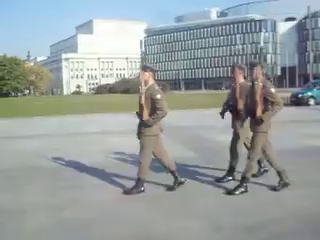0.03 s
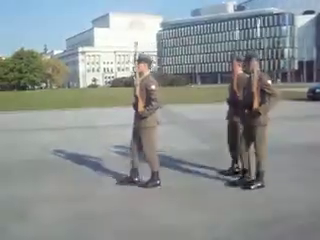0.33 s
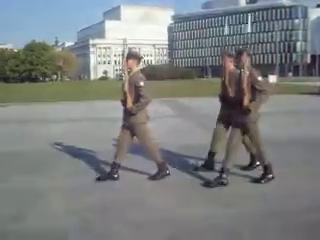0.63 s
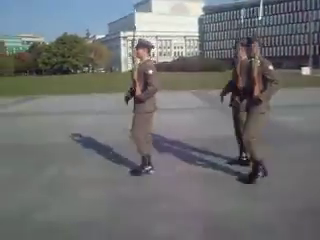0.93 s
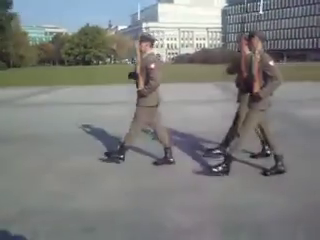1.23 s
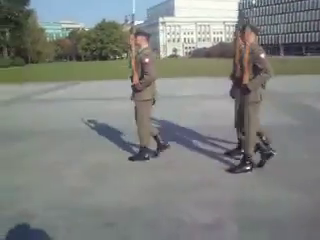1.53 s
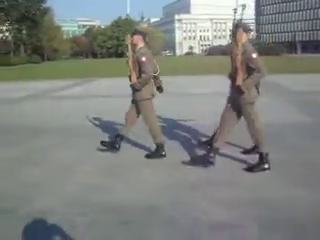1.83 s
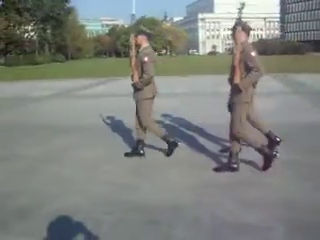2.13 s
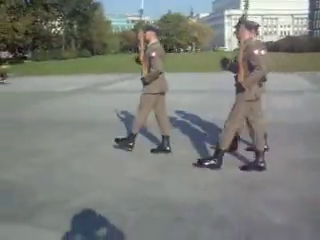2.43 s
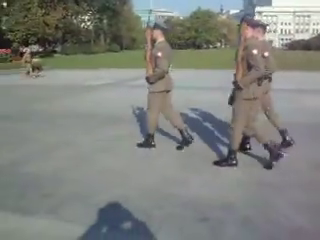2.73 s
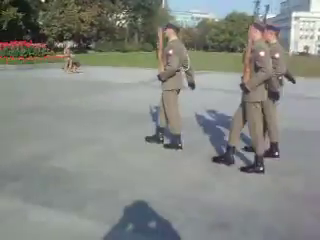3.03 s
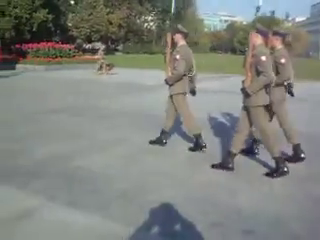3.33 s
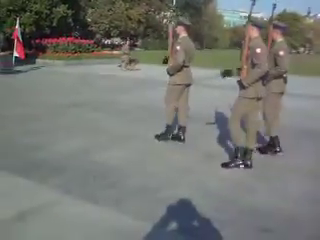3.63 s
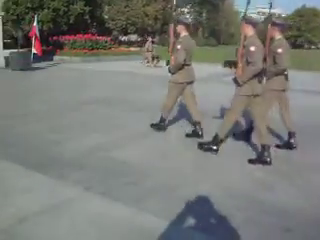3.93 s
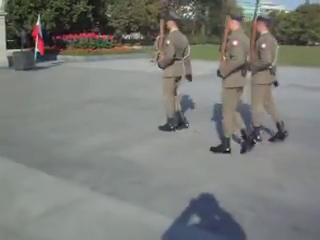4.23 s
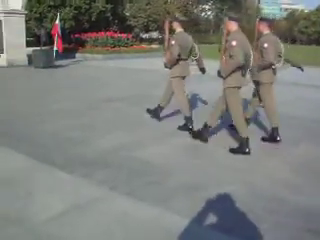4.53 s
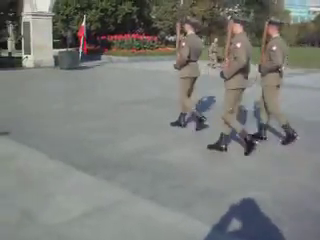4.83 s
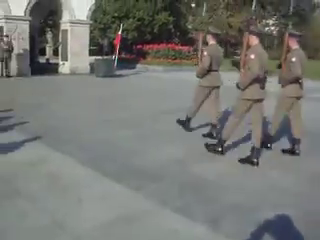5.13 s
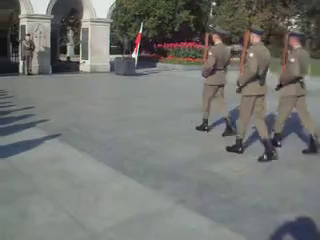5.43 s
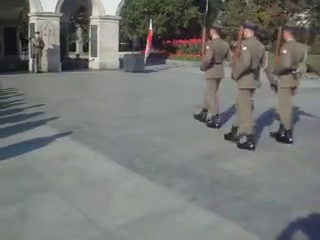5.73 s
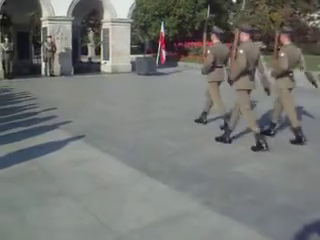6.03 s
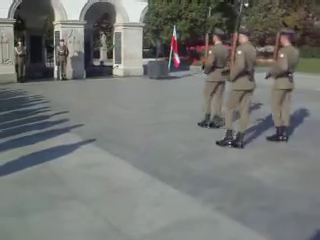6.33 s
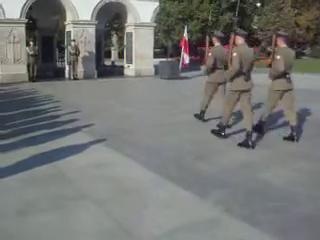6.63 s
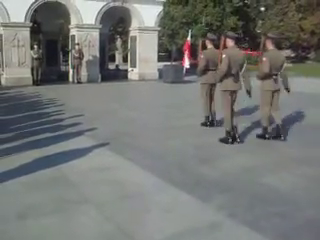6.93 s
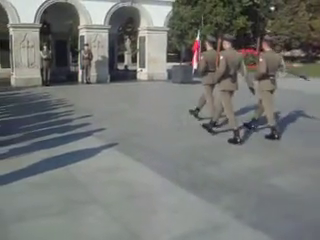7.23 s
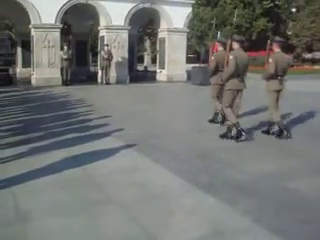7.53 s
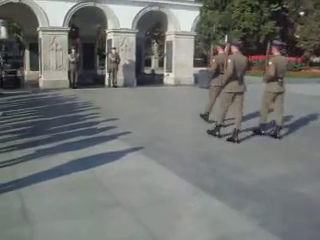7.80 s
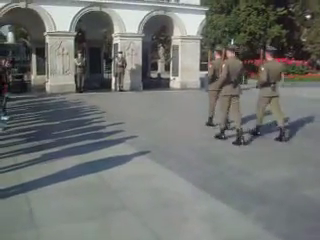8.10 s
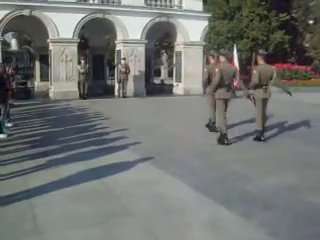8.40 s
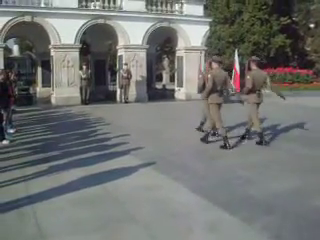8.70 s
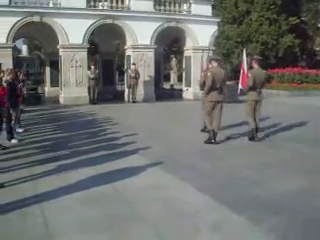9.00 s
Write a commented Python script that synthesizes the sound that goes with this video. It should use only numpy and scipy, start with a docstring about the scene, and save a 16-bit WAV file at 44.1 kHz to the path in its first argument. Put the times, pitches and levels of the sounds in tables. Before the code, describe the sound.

Guards' slow, even marching steps thud and scuff across an open stone square while far-off traffic hums.

```python
"""Far traffic hums round a wide stone square, and the recorder adds a thin whine. From the start,
three guards march in step: each pace is a gritty scuff, a heel thud and three ragged sole slaps,
echoed by a row of columns. Grit and kit click; a few squeaks and a creak come in the first two seconds.
One far engine speeds up, and from about two seconds on another is heard slowing down.
As the guards near the columns, the echo comes back sooner and louder."""
import sys
import numpy as np
from scipy import signal
from scipy.fft import rfft, irfft
from scipy.io import wavfile

SR = 44100
rng = np.random.default_rng(int(sys.argv[2]) if len(sys.argv) > 2 else 0)


def wav_out(sig):
    """Save sig, one row per channel (or a flat mono array), as 16-bit PCM at SR to the path in sys.argv[1]."""
    wavfile.write(sys.argv[1], SR, np.round(np.clip(np.atleast_2d(sig).T, -1, 1) * 32767).astype(np.int16))


N = 408366
T = np.arange(N) / SR
# One row a pace: the hardest heel lands and three soles slap down, never quite together.
# (heel time [s], lag of sole 1 [s], of sole 2 [s], of sole 3 [s], heel [dB], boom [dB], thump [dB],
# clap [dB], grit [dB], extra force of sole 2 [dB], of sole 3 [dB], air pocket pitch [Hz], scuff [dB])
PACES = [(0.0839, .0012, 0.0056, 0.017, -31.5, -35, -35.5, -38.5, -47, 5, 3, 2910, -59),
         (0.7579, .0075, .0116, .0163, -34, -25, -27, -35.5, -33.5, -2, -7.5, 1000, -61.5),
         (1.4156, .0203, .0231, .027, -29.5, -31.5, -30.5, -36, -39, -2, 3, 1370, -57.5),
         (2.0819, 0.014, .0198, 0.041, -26.5, -32, -35, -39.5, -41, 4.5, 5, 1450, -72),
         (2.7493, 0.021, .0312, 0.038, -30, -30.5, -33, -37.5, -42, 4, -2, 2250, -58.5),
         (3.4336, .016, .0203, 0.024, -29, -31.5, -40, -36.5, -38.5, 3, 5.5, 2500, -66),
         (4.1185, -0.0098, -0.013, .0165, -24, -39.5, -37, -39, -44, 5, 11.5, 1570, -59),
         (4.7929, -.0015, 0.0027, .0124, -23, -35, -34, -36, -40, 2.5, 5, 1460, -74),
         (5.453, 0.0077, .016, 0.025, -27, -30, -29.5, -34, -38.5, -1.5, -6.5, 1620, -57.5),
         (6.135, .011, .016, .0204, -25, -31.5, -28.5, -36.5, -36.5, -1, 1, 1090, -73),
         (6.8004, 0.012, .0164, 0.017, -27, -32, -28.5, -37, -41.5, -7, 1.5, 2300, -58),
         (7.473, 0.0061, .012, 0.026, -27.5, -36.5, -35, -37, -38, 3.5, 4, 2770, -75),
         (8.142, 0.015, .0177, 0.02, -28.5, -32, -32, -35, -39.5, -0.5, -1, 1620, -59),
         (8.8304, 0.00021, .0115, 0.02, -39, -32.5, -34, -36, -37.5, 0, -2, 2200, -71)]
# A footfall has four ranges, low to high: boom, thump, clap and grit. The first three end here.
BOOM_TOP_HZ, THUMP_TOP_HZ, CLAP_TOP_HZ = 400, 1100, 5300


def from_db(db):
    return 10 ** (np.asarray(db) / 20)


def rms_one(x):
    """Scale a sound to an average (rms) level of 1."""
    return x / np.sqrt(np.mean(x ** 2) + 1e-20)


def in_time(rows):
    """Join a table's timed points with straight lines: one curve for each column after the time."""
    s, *columns = np.transpose(rows)
    return [np.interp(T, s, c) for c in columns]


def band(x, low_hz, high_hz, order=2):
    """Keep the part of a sound between two frequencies."""
    sections = signal.butter(order, [low_hz, min(high_hz, SR / 2.2)], "band", fs=SR, output="sos")
    return signal.sosfilt(sections, x + 1e-18)


def resonate(x, hz, width_hz):
    """Make a sound ring at one pitch; the narrower the width, the longer it rings."""
    r = np.exp(-np.pi * width_hz / SR)
    gain = (1 - r * r) / 2
    section = [gain, 0, -gain, 1, -2 * r * np.cos(2 * np.pi * hz / SR), r * r]
    return signal.sosfilt([section, section], x + 1e-18)


def drift(per_s):
    """A random wander of about 1 either way, heading for a new value per_s times a second."""
    points = rng.standard_normal(8192)
    return rms_one(np.interp(T * per_s, np.arange(len(points)), points))


def coloured_noise(spectrum):
    """Noise that follows a table of (frequency [Hz], level [dB]) and falls away beyond its ends."""
    hz, db = np.transpose(spectrum)
    octave, known = np.log2(np.arange(N // 2 + 1) * SR / N + 1), np.log2(hz)
    beyond = np.abs(octave - np.clip(octave, known[0], known[-1]))
    gain = from_db(np.interp(octave, known, db) - 20 * beyond)
    return rms_one(irfft(rfft(rng.standard_normal(N)) * gain, N))


def add(track, s, sound):
    """Lay a short sound into a track at s seconds."""
    at = max(round(s * SR), 0)
    track[at:at + len(sound)] += sound[:max(N - at, 0)]


def contacts(times, levels_db, crunch, crunch_s):
    """Pushes on the ground: each a clean blow, then dying grit; crunch is the grit's share of energy."""
    force, age = np.zeros(N), T[:SR // 20]
    for s, db in zip(times, levels_db):
        grit = rng.standard_normal(len(age)) * np.exp(-age / crunch_s)
        blow = np.sqrt(crunch) * grit / np.linalg.norm(grit)
        blow[0] += np.sqrt(1 - crunch)
        add(force, s, from_db(db) * blow)
    return force


def road():
    """Tyres roar in far streets, with a faint hiss and a rumble that partly follows the roar."""
    # how the roar rises and falls: (time [s], level [dB])
    flow = [(0, -49), (1.8, -49), (2.4, -49.5), (3.7, -51.5), (4.5, -52), (5.2, -53), (7.3, -54),
            (9.26, -54.5)]
    # the tone of the rumble, the tyres and the hiss, each (frequency [Hz], level [dB])
    rumble_tone = [(20, -17), (35, -8), (55, 1), (80, -4), (130, -4.5), (200, -4), (300, -3.5), (450, -7.5),
                   (650, -17.5)]
    tyre_tone = [(350, -22), (500, -4.5), (680, 1.5), (880, 1), (1100, -6.5), (1400, -17.5), (2200, -40)]
    hiss_tone = [(900, 0.5), (1400, 3.5), (1800, 5), (2300, 1.5), (2900, -6), (3800, -9.5), (5200, -15),
                 (7000, -21), (10300, -25), (12000, -35)]
    flow_db, = in_time(flow)
    flow_db -= flow_db.mean()
    rumble_sway, tyre_sway, hiss_sway = .7 * drift(9), .7 * drift(8), .4 * drift(11)
    rumble = from_db(-53.5 + .44 * flow_db + rumble_sway) * coloured_noise(rumble_tone)
    tyres = from_db(-53.5 + flow_db + tyre_sway) * coloured_noise(tyre_tone)
    hiss = from_db(-57.5 + hiss_sway) * coloured_noise(hiss_tone)
    return rumble + tyres + hiss


def exhaust(hz, db, tones, waver):
    """A far exhaust drones, wavering on the air. Tones are (multiple of the firing rate, level [dB])."""
    phase = 2 * np.pi * np.cumsum(hz * (1 + waver * drift(12))) / SR
    drone = sum(from_db(level) * np.sin(multiple * phase) for multiple, level in tones)
    return from_db(db + drift(4.7)) * rms_one(drone)


def engines():
    """One engine gathers speed evenly up to a cruising pitch; the other eases off and its pitch sinks."""
    # the engine that speeds up: (time [s], level [dB])
    pulling_level = [(0, -61), (.7, -63.5), (1.3, -53), (2, -56), (5.2, -55.5), (5.7, -66), (7, -52.5),
                     (7.5, -59), (9.26, -65.5)]
    # the engine that slows: (time [s], firing rate [Hz], level [dB])
    slowing_curve = [(0, 94.7, -94), (2.3, 90.8, -71), (2.9, 82, -59.5), (4.3, 74, -57.5),
                     (6.3, 71.86, -60.5), (9.26, 64.4, -73)]
    start_hz, rise_hz_per_s, cruise_hz = 79.5, 6.5, 128
    pulling_hz = np.minimum(start_hz + rise_hz_per_s * T, cruise_hz)
    pulling = exhaust(pulling_hz, *in_time(pulling_level), tones=[(1, 0), (1.5, -6)], waver=.006)
    slowing = exhaust(*in_time(slowing_curve), tones=[(1, 0), (2, -15)], waver=.012)
    return from_db(-.6) * (pulling + slowing)


def scuffs():
    """Sand grains catch under a sliding sole: a rasp with a sizzle on top."""
    # soles brush the stone around each pace: (time after the first slap [s], length [s], level [dB])
    brushes = [(-.025, 0.052, -6.5), (0.01, 0.027, 9), (0.07, .05, -4.5)]
    # one boot drags after a stray step: (time [s], length [s], level [dB])
    drag = (1.36, .07, -60)
    strokes = [(s + first_lag + delay, length, scuff_db + db)
               for s, first_lag, *_, scuff_db in PACES for delay, length, db in brushes]
    sliding = sum(from_db(db) * np.exp(-2 * np.minimum(((T - s) / length) ** 2, 20))
                  for s, length, db in strokes + [drag])
    grains = rng.standard_normal(N) * from_db(5 * drift(500))
    rasp, sizzle = band(grains, 2000, 4600), band(grains, 5900, 11000)
    return sliding * rms_one(rasp + from_db(-9.5) * sizzle)


def heels():
    """The heel's edge ticks on grit; a moment later the weight arrives with a clean, hollow thud."""
    # how a heel rings on stone: (pitch [Hz], width [Hz], level [dB])
    rings = [(304, 163, 37), (682, 226, 36), (3000, 2200, 20), (7200, 2600, 23), (9200, 1700, 21)]
    s, _, _, _, thud_db, *_ = np.transpose(PACES)
    thud = np.zeros(N)
    thud[np.round((s + .0004) * SR).astype(int)] = from_db(thud_db)
    tick = contacts(s, thud_db - 7.5, crunch=.85, crunch_s=.001)
    return sum(resonate(thud if hz < THUMP_TOP_HZ else tick, hz, width) * from_db(db)
               for hz, width, db in rings)


def slaps():
    """Each pace brings down three soles: one row a sole, laid out like stray_steps in soles()."""
    # how the three boots differ: (weight [dB], clap [dB], grit [dB])
    boots = [(1, -0.5, 2), (1, -2.2, -2), (2, -2.1, -3.5)]
    rows = []
    for s, *lags, _, boom_db, thump_db, clap_db, grit_db, second_db, third_db, pocket_hz, _ in PACES:
        for lag, force_db, boot in zip(lags, (0, second_db, third_db), boots):
            weight, clap, grit = np.add(boot, force_db)
            rows.append((s + lag, boom_db + weight, thump_db + weight, clap_db + clap,
                         pocket_hz, grit_db + grit))
    return rows


def sole_body(boom, thump, clap, grit):
    """A sole rings at several pitches, each set off by the push in its own range."""
    # how a sole rings on stone: (pitch [Hz], width [Hz], level [dB])
    rings = [(187, 127, 28), (267, 288, 36.6), (666, 349, 39.1), (834, 320, 26.9), (1433, 890, 38.8),
             (2205, 1170, 37.2), (3300, 660, 25.7), (6580, 230, 26), (8430, 5700, 21.5)]
    ranges = [(BOOM_TOP_HZ, boom), (THUMP_TOP_HZ, thump), (CLAP_TOP_HZ, clap), (np.inf, grit)]
    out = np.zeros(N)
    for hz, width, db in rings:
        push = next(force for top_hz, force in ranges if hz < top_hz)
        out += from_db(db) * resonate(push, hz, width)
    return out


def soles():
    """A sole lands flat with a boom, thump, clap and crackle; the air squeezed from under it pops."""
    # footfalls out of step, mostly light:
    # (time [s], boom [dB], thump [dB], clap [dB], air pocket pitch [Hz], grit [dB])
    stray_steps = [(0.668, -50, -38.5, -49.5, 1130, -68), (0.701, -50, -44, -49, 1200, -66),
                   (1.3126, -35, -26, -38.5, 1130, -54), (1.3929, -36, -40, -46.5, 1700, -56),
                   (4.4689, -40, -36.5, -52, 1000, -56)]
    s, boom_db, thump_db, clap_db, pocket_hz, grit_db = np.transpose(slaps() + stray_steps)
    boom = contacts(s, boom_db, crunch=.08, crunch_s=.004)
    thump = contacts(s, thump_db, crunch=.08, crunch_s=.004)
    clap = contacts(s, clap_db, crunch=.87, crunch_s=.0043)
    grit = contacts(s, grit_db, crunch=.8, crunch_s=.003)
    out = sole_body(boom, thump, clap, grit)
    for at, db, hz in zip(s, clap_db, pocket_hz):
        pop_db = db + 36.5 - 4 * np.log2(hz / 1500)   # a smaller, higher pocket pops more weakly
        pop = resonate(signal.unit_impulse(SR // 20), hz, width_hz=750)
        add(out, at, from_db(pop_db) * pop)
    return out


def scatter(x, delay_s, rise_s, fade_s):
    """A swarm of tiny echoes swells after a delay, then dies away by 60 dB every fade_s."""
    age, response = T[:SR // 2], np.zeros(N)
    swarm = rng.standard_normal(len(age)) * (1 - np.exp(-age / rise_s)) * from_db(-60 * age / fade_s)
    add(response, delay_s, swarm / np.linalg.norm(swarm))
    return signal.fftconvolve(x, response[:SR])[:N]


def square(steps):
    """Steps bounce off legs and paving, leave a faint tail, and echo off the ever nearer columns."""
    echo_delay_s, sooner_s_per_s, louder_db_per_s = .099, .0051, 2.6
    near = band(scatter(steps, delay_s=.003, rise_s=.00077, fade_s=.04), 350, 12000, order=1)
    tail = band(scatter(steps, delay_s=.02, rise_s=.024, fade_s=.69), 340, 7000, order=1)
    returned = np.interp(T - (echo_delay_s - sooner_s_per_s * T), T, steps)
    dull = band(scatter(returned, delay_s=0, rise_s=.001, fade_s=.04), 1450, 2900)
    crisp = from_db(-1.5) * band(returned, 3000, 11000, order=1)   # flat stone mirrors some treble
    echo = from_db(-33 + louder_db_per_s * T) * (dull + crisp)
    return from_db(-12) * near + from_db(-22) * tail + echo


def taps():
    """Grit and kit click with no weight behind them: one short knock and a tick."""
    # sharp clicks: (time [s], knock level [dB], knock pitch [Hz], tick level [dB])
    clicks = [(.139, -20, 3000, -62), (0.7508, -6, 900, -43), (2.141, -27, 4200, -62),
              (2.156, -19, 4200, -62), (4.5, -13, 1700, -56), (5.3401, -26, 2500, -60),
              (5.56, -17, 2500, -50.5), (6.175, -15, 2520, -69), (7.0798, -13, 2400, -55),
              (7.095, -10, 2390, -52), (8.402, -29, 4100, -62)]
    s, knock_db, knock_hz, tick_db = np.transpose(clicks)
    out = from_db(26.5) * band(contacts(s, tick_db, crunch=.89, crunch_s=.00057), 2800, 8100)
    touch = contacts([0], [0], crunch=.65, crunch_s=.0024)[:SR // 20]
    for at, db, hz in zip(s, knock_db, knock_hz):
        add(out, at, from_db(db) * resonate(touch, hz, width_hz=1000))
    return out


def loose_grit(per_s, level_db):
    """Stray grains and bits of kit tick faintly at random moments."""
    times = rng.uniform(0, N / SR, round(per_s * N / SR))
    ticks = contacts(times, level_db + rng.normal(0, 3, len(times)), crunch=.8, crunch_s=.002)
    return band(ticks, 3500, 11000)


def squeaks():
    """Brief rubbing that sings: breathy when high, nearly pure when low."""
    # faint high squeaks: (time [s], length [s], pitch [Hz], width [Hz], level [dB])
    high_rubs = [(.93, .025, 6400, 600, -76), (1.0, .075, 6400, 700, -74), (1.035, .065, 5200, 550, -70)]
    # a short hollow creak after one pace: (time [s], length [s], pitch [Hz], level [dB])
    low_rubs = [(1.48, .025, 660, -49), (1.492, .03, 535, -45)]

    def swell(s, length, db):
        return from_db(db) * np.exp(-((T - s) / length) ** 2)
    high = sum(swell(s, length, db) * rms_one(resonate(rng.standard_normal(N), hz, width))
               for s, length, hz, width, db in high_rubs)
    low = sum(swell(s, length, db) * np.sqrt(2) * np.sin(2 * np.pi * hz * T)
              for s, length, hz, db in low_rubs)
    return high + low


def scene():
    """The boots and their echoes, over the far traffic."""
    steps = heels() + soles() + taps()
    small_sounds = scuffs() + squeaks() + loose_grit(per_s=4, level_db=-47.5)
    return (steps + square(steps) + small_sounds + road() + engines())[None]


def record(dry):
    """The recorder whines faintly, lets sound in after a moment and cuts the highest treble."""
    # the thin tones of the whine: (pitch [Hz], level [dB])
    whine_tones = [(5087, -83.5), (7644, -80.5), (8815, -85.5)]
    start_s, fade_in_s, soften_hz, cutoff_hz = .0735, .0099, 10900, 12600
    whine = sum(from_db(db) * np.sqrt(2) * np.sin(2 * np.pi * hz * T) for hz, db in whine_tones)
    opened = (dry + whine) * np.clip((T - start_s) / fade_in_s, 0, 1)
    dulled = signal.sosfilt(signal.butter(10, soften_hz, fs=SR, output="sos"), opened)
    return signal.sosfilt(signal.cheby2(18, 60, cutoff_hz, fs=SR, output="sos"), dulled)


dry = scene()
out = record(dry)
wav_out(out)
```